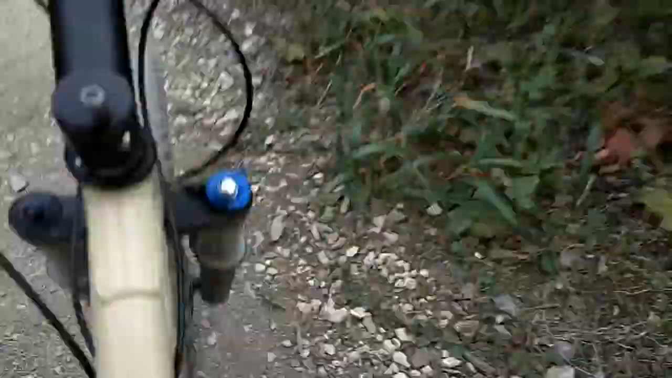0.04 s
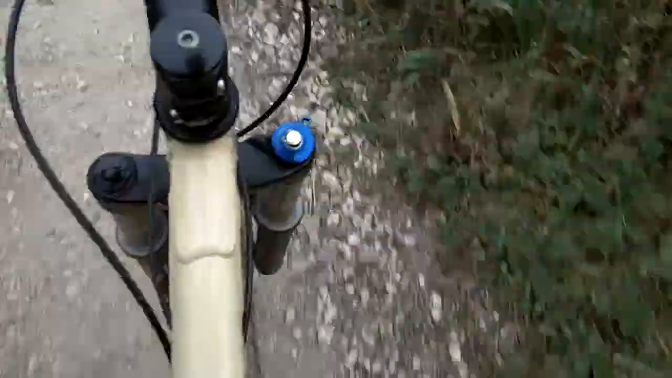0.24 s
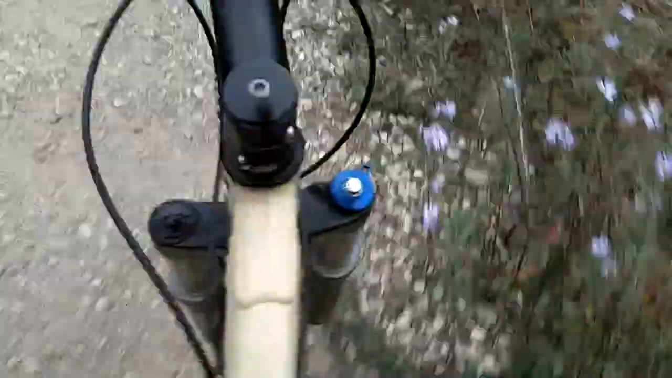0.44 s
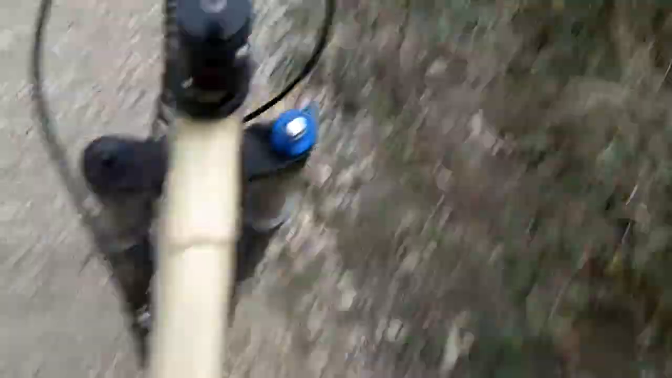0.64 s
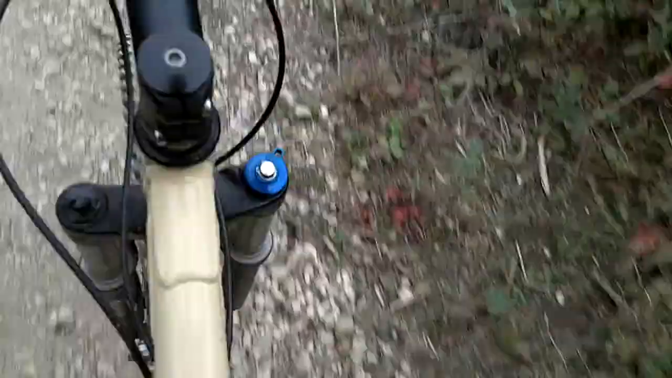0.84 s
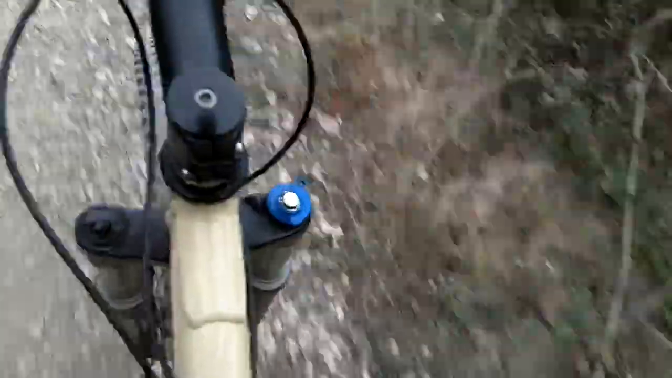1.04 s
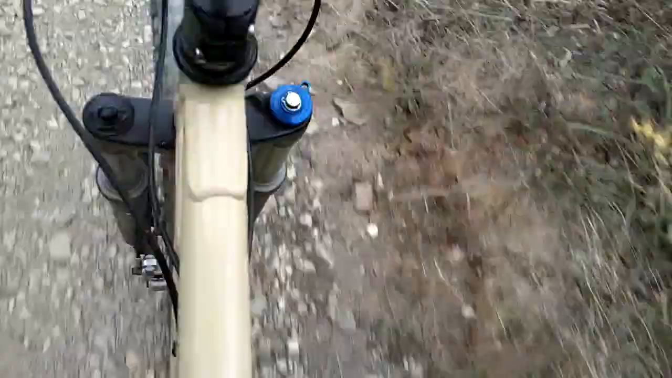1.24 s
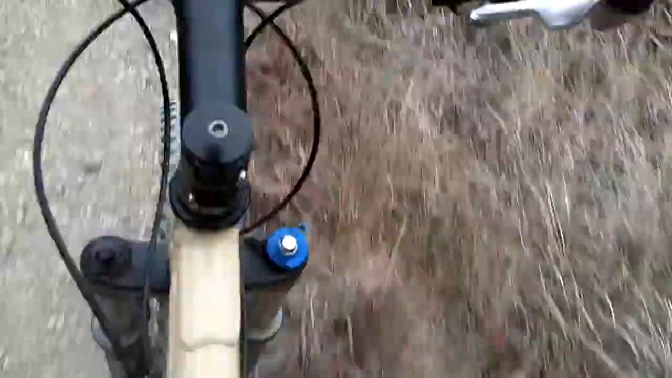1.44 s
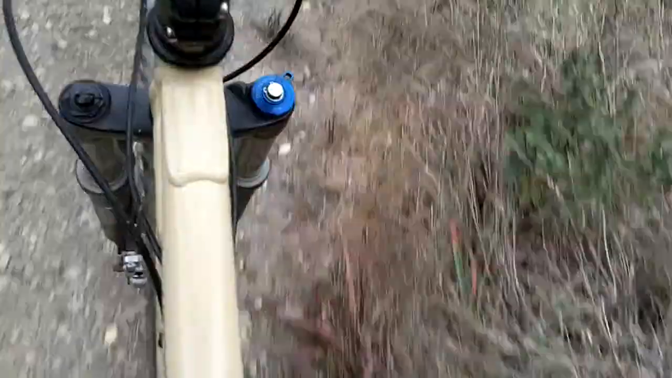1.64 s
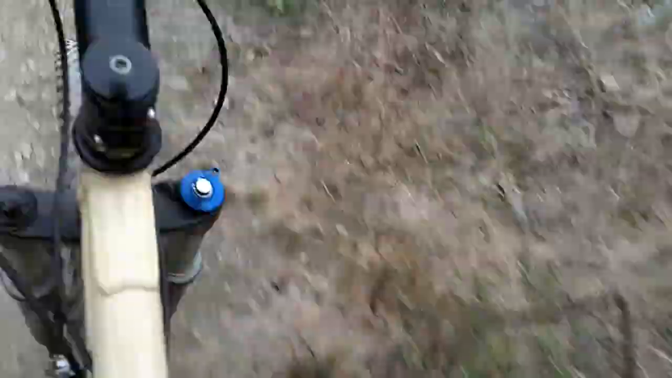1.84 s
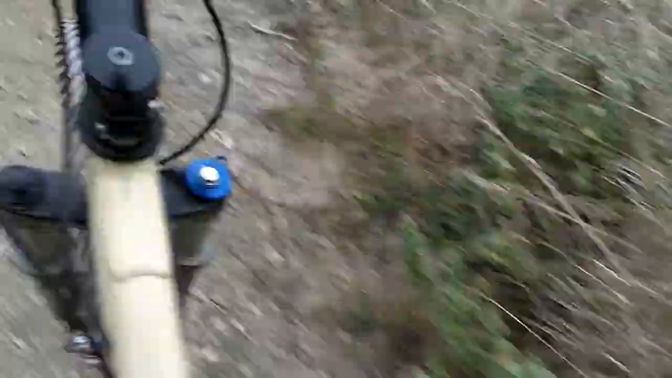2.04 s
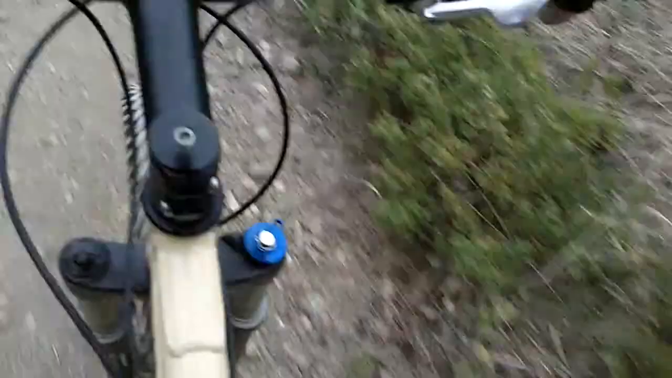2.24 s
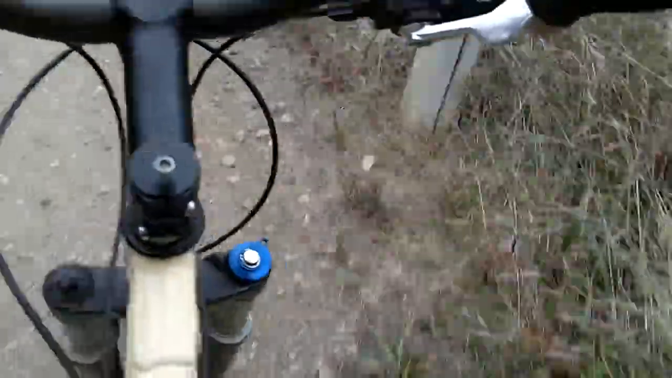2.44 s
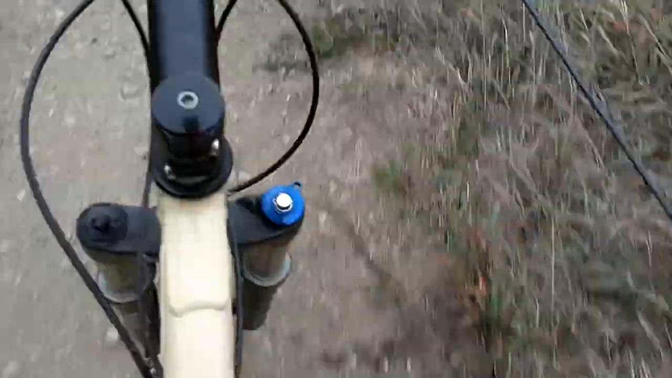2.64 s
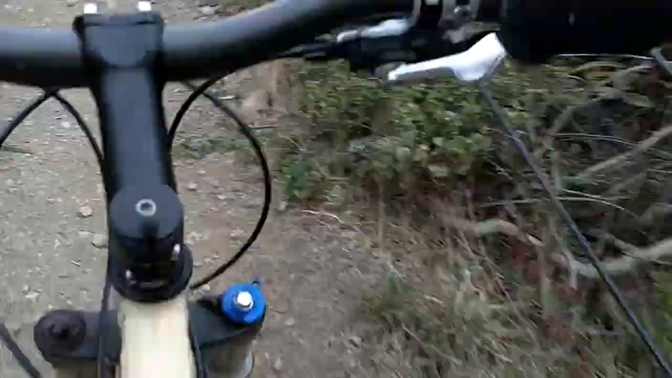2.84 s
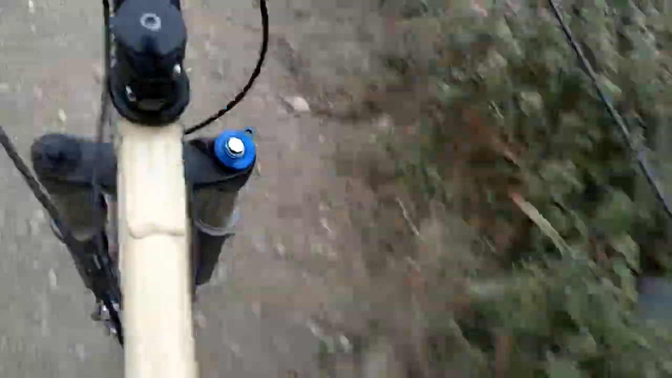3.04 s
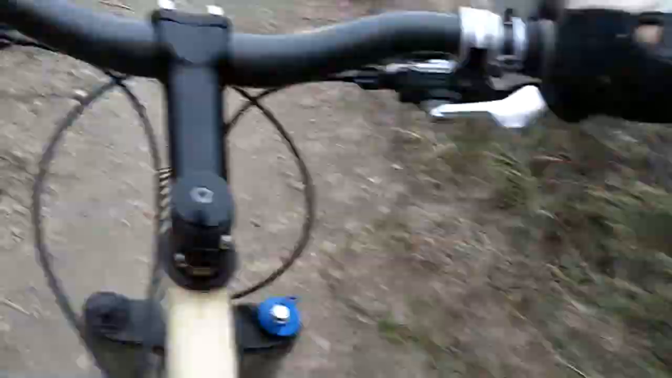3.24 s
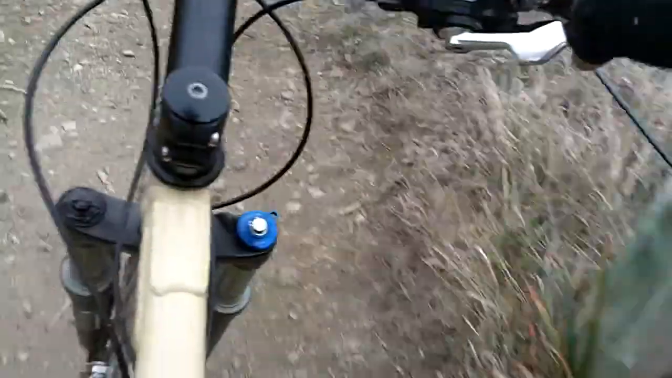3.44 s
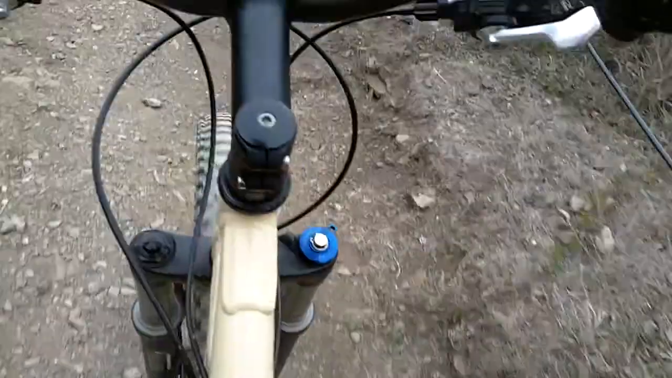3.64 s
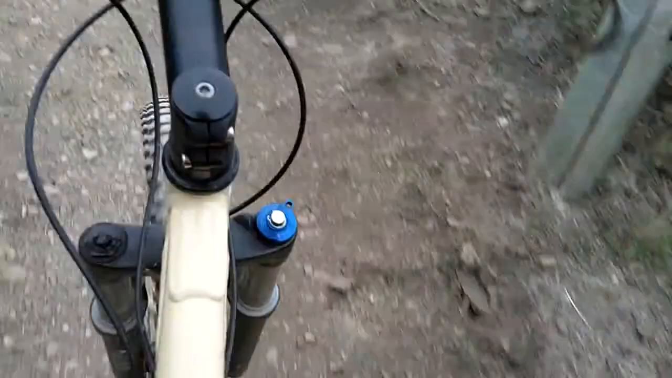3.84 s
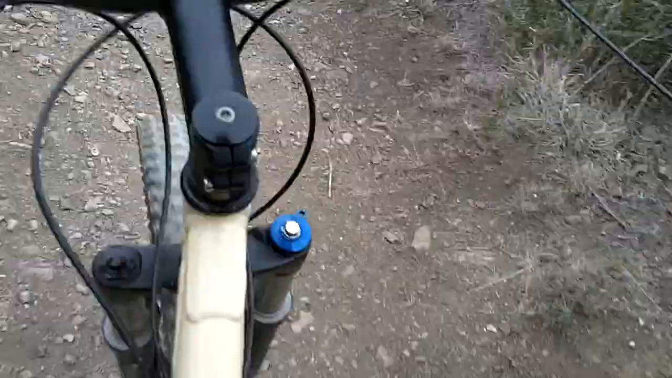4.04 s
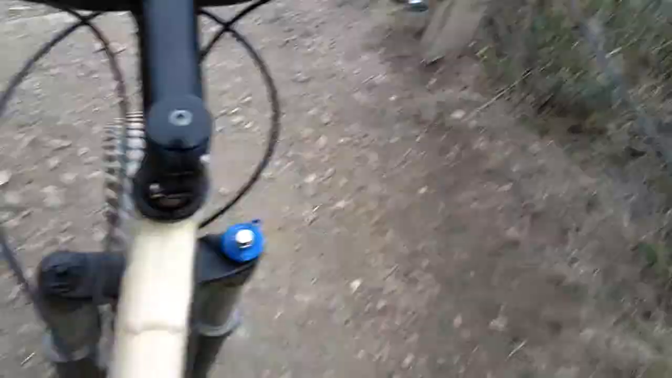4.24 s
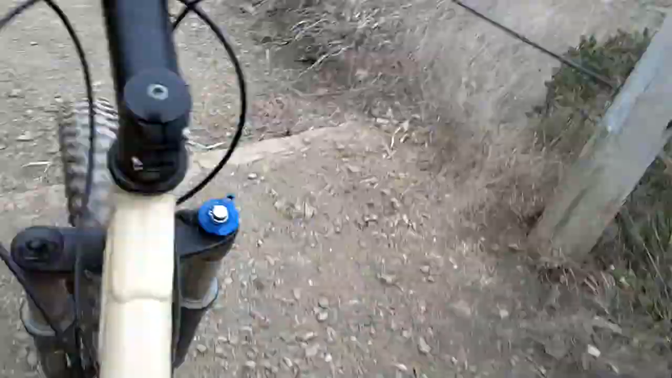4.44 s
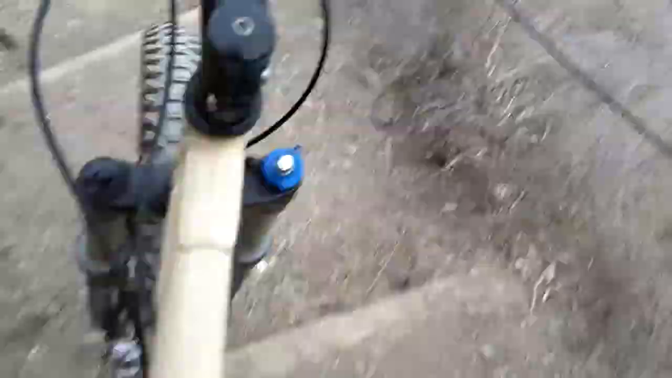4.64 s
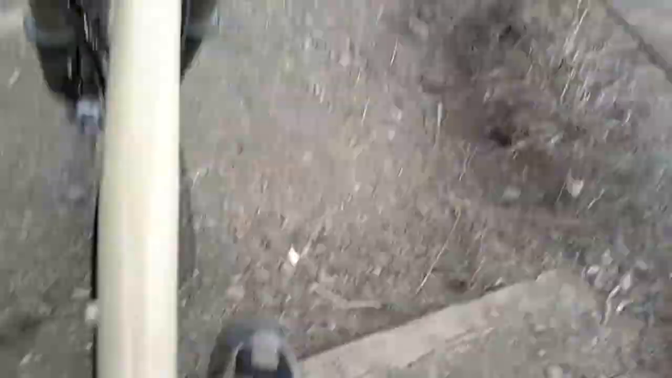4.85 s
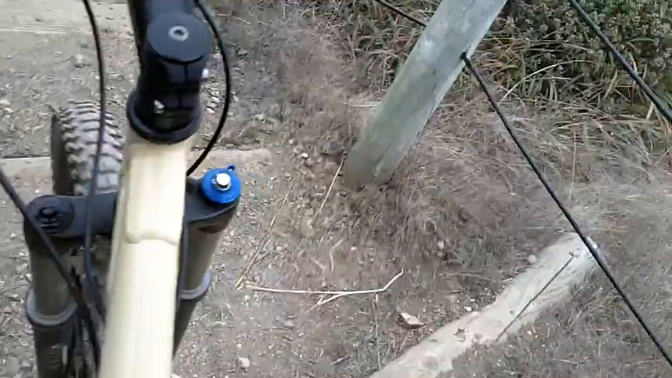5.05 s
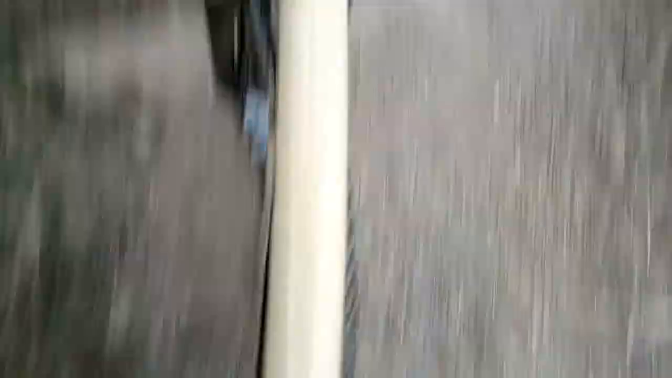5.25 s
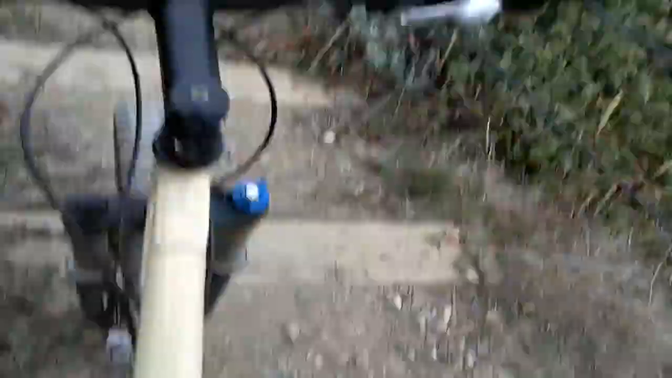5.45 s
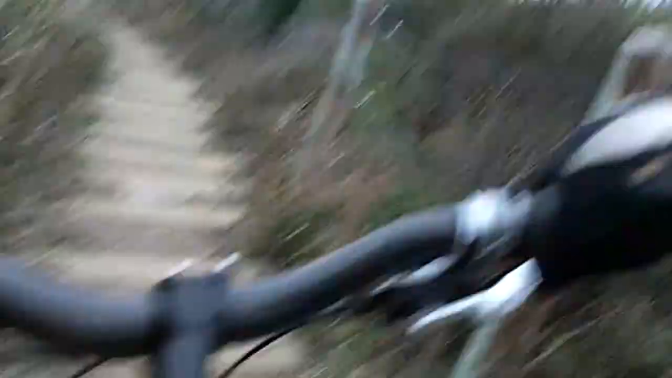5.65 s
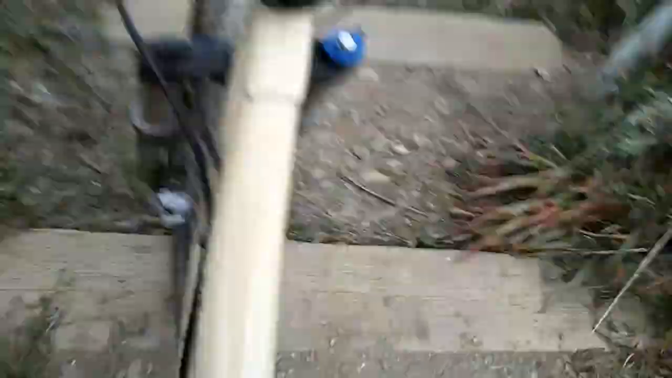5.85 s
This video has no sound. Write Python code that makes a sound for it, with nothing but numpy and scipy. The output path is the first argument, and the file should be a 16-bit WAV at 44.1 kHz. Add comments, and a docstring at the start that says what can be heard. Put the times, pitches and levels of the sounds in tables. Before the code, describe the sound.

A mountain bike speeds down a dry gravel trail, heard close and dry from a camera on the rider's chest. From 0 s, tyres make a dense, uneven gritty crunch over a hollow midrange drumming, fullest around 1.1 to 1.5 s, with stones cracking and popping at irregular moments. Low thuds of jolted air come at 0.1-0.2, 0.75 (with a plastic snap), 1.9, 2.5, 2.7, 3.1 and 3.8 s over soft wind rumble. Light chain ticks are scattered throughout. From about 2 s a faint, high freewheel sizzle fades in; a tiny disc ting sounds at 3.6 s, with faint brushing rings around it. Rolling weakens after 4.7 s. At 5.0 s a deep thump and sharp case snap begin the drop over timber steps: crowded heavy knocks, peaking at 5.3, 5.5 and 5.6 s, chain clatter strongest near 5.57 s, and rising, tearing wind with sharper pops until 5.9 s.

```python
"""Tyres crunch and drum on gravel as a mountain bike rolls fast downhill, then drops over timber steps.
We hear it from a camera on the rider's chest. Random tiny impacts, shaped by spectra, make the ground noise.
Larger stones crack, the freewheel buzzes, the chain rattles and a brake disc sings: clicks and noise that ring.
Wind is shaped noise and lumps, and jolts are short pushes of air that thump the camera.
Its case snaps in its mount with a very short ring, and cuts narrow hollows in the treble."""
import sys
import numpy as np
from scipy import signal
from scipy.fft import rfft, irfft
from scipy.io import wavfile
from scipy.ndimage import uniform_filter1d, map_coordinates

SR = 44100
rng = np.random.default_rng(int(sys.argv[2]) if len(sys.argv) > 2 else 0)


def dump(signal):
    """Clip the signal to [-1, 1] and save it as 16-bit WAV at the path in sys.argv[1]."""
    limited = np.clip(np.atleast_2d(signal).T, -1, 1)
    pcm = np.round(limited * 32767).astype(np.int16)
    wavfile.write(sys.argv[1], SR, pcm)


N = 260631
TIME = np.arange(N) / SR  # seconds
LEAD_S = 0.02  # a burst starts this long before its main contact

# All levels in the tables are relative: each source also has a gain of its own.
# how strongly the tyres roll on the ground: [time_s, drumming_db, crunch_db]
ROLLING = [(0.0, -40.5, -35), (0.42, -38, -38), (0.7, -39, -36), (1.1, -33, -32.5), (1.5, -35.5, -33),
           (1.95, -35.5, -34.5), (2.5, -37, -34.5), (2.7, -37.5, -36.5), (3.1, -38.5, -34.5),
           (3.85, -40, -36.5), (4.6, -40.5, -37.5), (4.8, -50.5, -44.5), (5.13, -48, -49.5),
           (5.91, -57, -58)]
# jolts and gusts, low ones soft heaves, high ones short pops: [time_s, level_db, pitch_hz, stirred_air_db]
JOLTS = [(0.134, -15.5, 110, -36), (0.235, -16, 128, -38), (0.355, -22, 155, -36), (0.652, -28, 178, -32),
         (0.745, -20, 75, -36.5), (0.902, -21, 118, -49), (1.882, -19, 109, -37.5), (2.017, -23, 140, -45),
         (2.478, -15.5, 160, -31), (2.549, -24, 63, -32), (2.712, -15.5, 125, -40),
         (3.125, -12.5, 77, -28.5), (3.171, -19, 170, -36), (3.835, -16.5, 67, -44),
         (3.952, -18.5, 228, -34), (4.006, -27, 140, -33.5), (4.172, -22.5, 126, -47),
         (5.016, -10, 45.3, -25), (5.168, -15, 88.5, -26.5), (5.182, -10.5, 90, -32),
         (5.207, -10.5, 170, -29), (5.235, -14.5, 190, -29), (5.293, -2.5, 163, -30),
         (5.307, -14, 249, -45), (5.351, -13.5, 340, -22.5), (5.522, -2, 390, -25.5),
         (5.585, -13, 150, -31), (5.622, -1, 185, -23), (5.673, -9.5, 126, -36), (5.694, -17, 600, -35),
         (5.721, -9.5, 317, -33), (5.733, -12, 211, -25), (5.83, -5, 680, -23), (5.838, -6.5, 497, -32),
         (5.884, -4.5, 211, -22.5), (5.896, -3.5, 665, -36)]
# resonances of the tyre: [pitch_hz, width_hz, height_db above the spectrum]
TYRE_RESONANCES = [(292, 35, 9), (515, 26, 0), (666, 34, 3.5)]
# metal resonances of the hub, used for the chain too: [pitch_hz, width_hz, height_db above the spectrum]
METAL_RESONANCES = [(3830, 300, 6.6), (4140, 440, 8.5), (6010, 90, 8.3), (9580, 130, 4.8), (13950, 110, 5)]
# colour of the chain's sound: [frequency_hz, level_db]
CHAIN_SPECTRUM = [(1000, -93), (3000, -19), (4500, 12), (6500, 9), (9000, 4.5), (12000, -9), (16000, -2)]


def amp(db):
    """Turns decibels into a gain."""
    return 10 ** (np.asarray(db) / 20)


def evened(x):
    """Scales a sound to an rms of one."""
    return x / np.sqrt(np.mean(x ** 2) + 1e-20)


def follow(rows, axis):
    """The gain that one dB column of a curve gives at every sample."""
    rows = np.array(rows)
    return amp(np.interp(TIME, rows[:, 0], rows[:, axis]))


def add(mix, start_s, sound):
    """Mixes a sound in at a time."""
    part = mix[max(round(start_s * SR), 0):][:len(sound)]
    part += sound[:len(part)]


def band(x, edges_hz):
    """Keeps the part of a sound between two frequencies."""
    return signal.sosfilt(signal.butter(3, edges_hz, "band", fs=SR, output="sos"), x)


def drift(rate_hz):
    """A random wavering of rms one, whose changes weaken above a rate."""
    hz = np.fft.rfftfreq(N, 1 / SR)
    spectrum = rfft(rng.standard_normal(N)) / (1 + (hz / rate_hz) ** 2)
    return evened(irfft(spectrum, N))


def swell(peak_s, rise_s, fall_s):
    """A rounded envelope that reaches one at a time."""
    t = TIME - peak_s
    return np.exp(-np.minimum((t / np.where(t < 0, rise_s, fall_s)) ** 2, 50))


def body(spectrum, modes=(), size=8192):
    """What an object sounds like when struck once: a smooth spectrum with resonances standing on it."""
    hz = np.fft.rfftfreq(size, 1 / SR)
    spectrum_hz, level_db = np.transpose(spectrum)
    gain = amp(np.interp(np.log(hz + 1), np.log(spectrum_hz), level_db))
    peaks = sum(amp(height) ** 2 / (1 + (2 * (hz - pitch) / width) ** 2) for pitch, width, height in modes)
    gain = gain * np.sqrt(1 + peaks)
    # folding the cepstrum (the spectrum of the log gain) makes the response start at once
    cepstrum = irfft(np.log(gain))
    cepstrum[1:size // 2] *= 2
    cepstrum[size // 2 + 1:] = 0
    return irfft(np.exp(rfft(cepstrum)))[:size // 2]


def sound_of(drive, response, edges_hz):
    """Drives a body, and scales the result to an rms of one within a band."""
    x = signal.oaconvolve(drive, response)[:N]
    return x / np.std(band(x, edges_hz))


def grains(per_s, spread_db, size=N):
    """Tiny impacts at random times, with random signs and strengths."""
    strength = amp(spread_db * np.minimum(rng.exponential(1, size), 4))
    sign = rng.choice([-1, 1], size)
    happens = rng.random(size) < per_s / SR
    return strength * sign * happens


def burst(response, edges_hz, length_s, per_s, build, contact, size=4096):
    """Impacts on one body build up to a main contact at LEAD_S and die away; scaled by its loudest moment."""
    t = np.arange(size) / SR - LEAD_S
    hits = grains(per_s, spread_db=2.0, size=size)
    hits[round(LEAD_S * SR)] = contact
    fade_s = np.where(t < 0, build, 1) * length_s
    x = signal.fftconvolve(hits * np.exp(-abs(t / fade_s)), response)[:size]
    # the highest short-time rms within the band becomes one
    return x / np.sqrt(uniform_filter1d(band(x, edges_hz) ** 2, size=128).max())


def tyres(flutter_db=2.5, grind_power=2.07, patchy_db=0.72):
    """Knobs drum on the ground and ring the casing, while grit cracks beneath them in clumps."""
    # colours of the drumming, of loose gravel shifting under load, and of the crunch: [frequency_hz, level_db]
    tread_spectrum = [(120, -14.5), (230, -8), (300, 1), (420, 0), (690, -1.5), (850, -8.5), (1100, -13),
                      (1600, -21), (3000, -43), (8000, -43)]
    grind_spectrum = [(300, -33.5), (700, -10), (850, -0.5), (1000, -3.5), (1130, 5), (1330, -4.5),
                      (1550, -24), (3000, -1.5), (6000, -31), (9500, -20), (15000, -54)]
    gravel_spectrum = [(300, -29), (900, -4.5), (1400, -2), (1800, 3), (2350, 3.5), (3300, 2), (4300, -1.5),
                       (5200, -2.5), (6500, -12), (8000, -24.5), (10000, -17), (11800, -39), (14000, -18.5),
                       (16000, -41)]

    ground = drift(rate_hz=59)  # the uneven load on the tread
    force = load(axis=1)
    knobs = evened(grains(per_s=1500, spread_db=2.0)) * amp(2 * ground)
    drum = force * sound_of(knobs, body(tread_spectrum, TYRE_RESONANCES), (400, 1400))

    slips = grains(per_s=2200, spread_db=2.2) * amp(1.6 * ground)
    shifting = sound_of(slips, body(grind_spectrum), (400, 1400))
    # the grinding grows steeply with the load, up to a limit
    grind = shifting * np.minimum(force / amp(-32), 1.1) ** grind_power

    flutter = flutter_db * drift(rate_hz=150)
    dust = evened(grains(per_s=5000, spread_db=3.0) * amp(2 * ground + flutter))
    grit = dust + amp(-1) * pebbles(ground)
    crunch = sound_of(grit, body(gravel_spectrum), (1600, 5200)) * load(axis=2)

    patches = amp(patchy_db * drift(rate_hz=51))  # looser and firmer patches of ground
    return patches * (amp(-2.0) * drum + amp(-36) * grind + amp(0.7) * crunch)


def load(axis, turns_per_s=3.2, heavy_s=0.026, sway_db=0.21, rise_share=0.45):
    """Strength of drumming or crunch: rolling swells once in every wheel turn, and each bite adds to it."""
    # a tyre bites into the ground in a dip or on a step: [time_s, drumming_db, crunch_db, length_s]
    bite_rows = [(0.78, -40, -31.5, .02), (0.867, -55, -36, 0.071), (0.972, -54, -29.5, 0.047),
                 (1.266, -33.5, -30, 0.038), (4.266, -33.5, -30.5, 0.038), (4.36, -36, -32.5, 0.02),
                 (4.486, -36, -39, 0.049), (4.844, -41, -36.5, 0.04), (4.908, -42, -31.5, 0.012),
                 (4.965, -41, -34, 0.057), (5.225, -40.5, -32.5, 0.044), (5.275, -58, -33, 0.072),
                 (5.42, -57, -43, 0.12), (5.482, -33.5, -40, 0.028), (5.511, -29.5, -41, 0.025),
                 (5.557, -33, -35, 0.046), (5.613, -33.5, -38, 0.013), (5.711, -37.5, -45, 0.054),
                 (5.756, -39, -42.5, 0.041), (5.819, -32.5, -51, .015), (5.853, -34.5, -38.5, 0.063)]

    sway = amp(sway_db * np.cos(2 * np.pi * turns_per_s * (TIME - heavy_s)))
    # a bite swells in a share of its length, and fades over the whole length
    bites = sum((amp(row[axis]) * swell(row[0], rise_share * row[-1], row[-1])) ** 2 for row in bite_rows)
    return np.sqrt((sway * follow(ROLLING, axis)) ** 2 + bites)


def pebbles(ground, clump_db=2.5, sharpness=16, count=36):
    """Each size of pebble clacks at its own pitch, in its own flurries."""
    out = np.zeros(N)
    flurry_s = np.arange(0, N / SR + 0.1, 0.02)
    for hz in np.geomspace(1100, 12000, count) * rng.uniform(0.97, 1.03, count):
        flurry = np.interp(TIME, flurry_s, rng.standard_normal(len(flurry_s)))
        hits = evened(grains(per_s=70, spread_db=2.5) * amp(clump_db * flurry + 2.07 * ground))
        out += signal.lfilter(*signal.iirpeak(hz, sharpness, SR), hits)
    return evened(out)


def stones():
    """Larger stones are crushed or spat out by a tyre: short bursts of impacts, each with its own pitch."""
    # single stones: [time_s, level_db, length_s, pitch_hz]
    stone_rows = [(0.04, -26.5, 0.012, 2500), (0.354, -27.5, 0.0039, 3440), (0.497, -26, 0.0085, 2040),
                  (0.596, -27, 0.0096, 2100), (0.67, -23.5, 0.0097, 1880), (1.001, -25, 0.014, 3140),
                  (1.056, -24.5, 0.03, 2240), (1.125, -25.5, 0.029, 3280), (1.384, -27, 0.0044, 2060),
                  (1.429, -27, 0.022, 1060), (1.457, -25, .007, 3070), (1.531, -22.5, 0.0054, 1900),
                  (1.7593, -23, 0.0096, 1340), (1.8047, -28, .007, 1310), (1.9424, -26, 0.0031, 1100),
                  (2.04, -21.5, 0.0062, 2210), (2.079, -27.5, 0.0067, 1920), (2.204, -28, 0.0052, 2000),
                  (2.372, -27.5, .005, 3480), (2.475, -26.5, 0.005, 1800), (2.606, -23, 0.0045, 1900),
                  (2.652, -25, 0.0046, 1850), (2.715, -28.5, .003, 1790), (2.755, -27.5, 0.018, 1880),
                  (3.226, -29, .007, 1730), (3.832, -29.5, 0.0081, 3650), (4.155, -28.5, 0.0021, 1870),
                  (4.84, -34.5, 0.0063, 880), (5.175, -30, 0.011, 4260), (5.257, -23.5, 0.0032, 2880),
                  (5.487, -32.5, .004, 1690), (5.561, -25, 0.0096, 4600), (5.62, -22, 0.0037, 3200)]
    # colour of a stone: [frequency_hz, level_db]
    stone_spectrum = [(200, -9.5), (600, 2), (1400, -3.5), (1900, 6), (3400, 5.5), (5000, -5.5),
                      (7000, -14), (11000, -28), (16000, -75)]

    out, edges_hz = np.zeros(N), (1500, 5200)
    for s, db, length_s, hz in stone_rows:
        own_pitch = (hz, 0.32 * hz, 6)
        response = body(stone_spectrum, TYRE_RESONANCES + [own_pitch])
        crack = burst(response, edges_hz, length_s, per_s=2500, build=0.28, contact=3.2)
        add(out, s - LEAD_S, amp(db + 3.5) * crack)
    return out


def freewheel(clicks_hz=310, wobble=0.14, hiss=0.93):
    """Pawls tick over the ratchet so fast that the hub gives a ringing sizzle."""
    # strength of the buzz while coasting: [time_s, level_db]
    coasting = [(1.9, -86), (2.05, -62.5), (2.8, -55), (4.72, -56), (4.87, -70), (5.91, -59)]
    # colour of the pawls' clicks: [frequency_hz, level_db]
    pawl_spectrum = [(800, -43), (2000, -23), (3000, -29.5), (4200, 3.5), (5500, 4), (7000, -6.5),
                     (8500, -3.5), (9700, -1), (11500, -23), (13300, -13), (16000, -19)]

    teeth = np.cumsum(clicks_hz * (1 + wobble * drift(rate_hz=3.8))) / SR  # teeth passed so far
    clicks = np.exp(-(teeth % 1) / 0.4)
    ticks = (hiss * 0.44 + clicks) * rng.standard_normal(N)
    ring = sound_of(ticks, body(pawl_spectrum, METAL_RESONANCES), (8800, 10400))
    return amp(1.5) * ring * follow(coasting, axis=1)


def with_bounce(x, delay_s=0.00132, sway=0.14, share=0.69):
    """Adds the reflection off the rider's moving legs, whose changing path makes the treble swish."""
    delay = delay_s * (1 + sway * drift(rate_hz=2.0))
    return x + share * map_coordinates(x, [(TIME - delay) * SR], order=3)


def chain():
    """The chain and cables slap the frame: quick bursts of impacts that ring like metal."""
    # single rattles: [time_s, level_db, length_s]
    rattle_rows = [(0.535, -31, .005), (0.602, -30.5, 0.004), (0.92, -30, 0.0034), (0.943, -35, .004),
                   (1.63, -26.5, 0.0029), (1.862, -26, 0.0029), (2.232, -29, 0.0054), (3.925, -33, .0065),
                   (4.006, -33, .005), (4.167, -32, 0.0041), (4.329, -27.5, .007), (4.939, -34.5, 0.0036),
                   (5.079, -30.5, 0.0075), (5.162, -29.5, 0.0029), (5.26, -28, 0.0053), (5.316, -28, 0.004),
                   (5.384, -36, 0.012), (5.431, -27.5, 0.0078), (5.439, -27, 0.0096), (5.511, -26, 0.013),
                   (5.559, -20.5, 0.0083), (5.574, -19.5, 0.0086), (5.704, -32, 0.0066)]

    out, edges_hz = np.zeros(N), (5700, 15000)
    response = body(CHAIN_SPECTRUM, METAL_RESONANCES)
    for s, db, length_s in rattle_rows:
        rattle = burst(response, edges_hz, length_s, per_s=2200, build=0.04, contact=1.8)
        add(out, s - LEAD_S, amp(db - 5.5) * rattle)
    return out


def jingling(per_s=20, level_db=-46.5, power=2.3, length_s=0.004, size=1024):
    """The slack chain jingles lightly by itself, much more where the tyres drum harder."""
    cluster = rng.standard_normal(size) * np.exp(-np.arange(size) / SR / length_s)
    envelope = signal.oaconvolve(abs(grains(per_s, spread_db=4.5)), abs(cluster))[:N]
    touches = envelope * rng.standard_normal(N)
    ring = sound_of(touches, body(CHAIN_SPECTRUM, METAL_RESONANCES), (5700, 15000))
    shaking = follow(ROLLING, axis=1)
    return amp(level_db) * ring * (shaking / shaking.max()) ** power


def disc(size=8192):
    """A brake disc touches its pad: the thin steel swells into one note and dies away."""
    # single touches: [start_s, level_db, pitch_hz, decay_s]
    ting_rows = [(3.637, -30, 6635, 0.014)]

    out, t = np.zeros(N), np.arange(size) / SR
    for s, db, hz, decay_s in ting_rows:
        envelope = (1 - np.exp(-t / 0.004)) * np.exp(-t / decay_s)
        add(out, s, amp(db) * envelope * np.sin(2 * np.pi * hz * t))
    return out


def rubbing(pitch_hz=5960, width_hz=50):
    """The brushing pad keeps one narrow resonance of the brake disc singing faintly."""
    # single brushes: [middle_s, level_db, half_length_s]
    rub_rows = [(2.75, -51, 0.17), (3.14, -57, .07), (3.702, -50, 0.094), (3.912, -46, 0.046),
                (4.55, -46, 0.076)]

    sharpness = pitch_hz / width_hz
    ring = evened(signal.lfilter(*signal.iirpeak(pitch_hz, sharpness, SR), rng.standard_normal(N)))
    return ring * sum(amp(db) * swell(s, half_s, half_s) for s, db, half_s in rub_rows)


def snaps(size=1024, blow=0.22, blow_hz=900):
    """The camera case snaps against its mount, hard plastic on plastic: a sharp blow with a very short ring."""
    # single snaps: [time_s, level_db]
    snap_rows = [(0.7444, -12.5), (5.0137, -7), (5.3639, -10), (5.6779, -17.5)]
    # what the case rings with: [pitch_hz, level_db, t60_s (time to fall by 60 dB)]
    case_ring = [(1620, -29, 0.0095), (3300, 18, 0.0082), (4990, 36, 0.0039), (6100, 34.5, 0.0046),
                 (6800, -62, .004), (10300, -20, 0.0046), (13700, 19, 0.00071)]

    out, t = np.zeros(N), np.arange(size) / SR
    ring = -sum(amp(db - 60 * t / t60) * np.sin(2 * np.pi * hz * t) for hz, db, t60 in case_ring)
    u = 2 * np.pi * blow_hz * t
    snap = ring / abs(ring).max() - blow * (1 - u) * np.exp(-u)
    for s, db in snap_rows:
        add(out, s + 0.0006, amp(db + 6.5) * snap)
    return out


def thumps(stretch=1.52, judder=0.028, mount_hz=190, mount_decay_s=0.0095):
    """Each jolt pushes the air at the microphone, which swings back more slowly while the mount judders."""
    out = np.zeros(N)
    t = np.arange(-SR // 20, SR // 20) / SR
    slow = np.where(t > 0, stretch, 1)
    after = np.maximum(t, 0)
    ring = judder * np.exp(-after / mount_decay_s) * np.sin(2 * np.pi * mount_hz * after)
    for s, db, hz, _ in JOLTS:
        u = 2 * np.pi * hz * t / slow
        push = -u * np.exp((1 - u ** 2) / 2) / slow
        add(out, s + t[0], amp(db) * (push - ring))
    return out


def wind(gusty_db=1.5, eddy_db=-13, tear_db=-33.5, tear_at_db=-19, tear_power=2.34):
    """A deep rumble and lumpy eddies break on the case, stirred by every thump; strong wind tears at it."""
    # strength of the steady wind: [time_s, level_db]
    wind_curve = [(0.0, -38), (0.5, -33.5), (1.05, -30), (1.6, -41), (2.0, -29.5), (2.3, -36.5), (2.8, -33),
                  (3.5, -39.5), (4.05, -35), (4.8, -41), (5.1, -35), (5.43, -32), (5.55, -26), (5.91, -21)]
    # colours of the rumble, of the eddies and of the tearing: [frequency_hz, level_db]
    rumble_spectrum = [(8, 8), (22, 3), (60, -2.5), (100, -8.5), (180, -22.5), (400, -18), (1500, -104)]
    eddy_spectrum = [(40, -34.5), (110, 10.5), (200, 6.5), (300, 0), (500, -10), (1000, -64), (3000, -57)]
    tear_spectrum = [(100, -4), (300, 5.5), (550, 10), (900, 1.5), (1400, -4), (2200, -44), (5000, -46)]

    gusty_air = rng.standard_normal(N) * amp(gusty_db * drift(rate_hz=11))
    rumble = sound_of(gusty_air, body(rumble_spectrum), (20, 90))
    eddies = sound_of(grains(per_s=600, spread_db=2.2), body(eddy_spectrum), (110, 250))
    tearing = sound_of(grains(per_s=700, spread_db=-1.0), body(tear_spectrum), (400, 1400))

    steady = follow(wind_curve, axis=1)
    # the air stirred around each thump
    stirred = np.sqrt(sum((amp(db) * swell(s, rise_s=0.013, fall_s=0.04)) ** 2 for s, _, _, db in JOLTS))
    deep = rumble * np.hypot(steady, stirred)
    lumpy = eddies * np.hypot(amp(eddy_db) * steady, stirred)
    # tearing has the level tear_db where the wind is at tear_at_db, and grows steeply with the wind
    torn = amp(tear_db) * tearing * (steady / amp(tear_at_db)) ** tear_power
    return deep + lumpy + torn


def scene():
    """Adds up all the sources, close and dry, out in the open."""
    sizzle = band(with_bounce(freewheel()), (2200, 18000))
    bike = tyres() + stones() + sizzle + chain() + jingling() + disc() + rubbing()
    return (bike + snaps() + thumps() + wind())[None]


def record(dry, edge_hz=15350):
    """The case cuts narrow hollows in the treble, the loudest peaks are rounded off, and the top treble is cut."""
    # bands that the cavity in front of the microphone cancels: [frequency_hz, width_hz]
    hollow_rows = [(2702, 1034), (5502, 680), (7881, 2270), (10917, 500)]

    for hz, width_hz in hollow_rows:
        dry = signal.lfilter(*signal.iirnotch(hz, hz / width_hz, SR), dry)
    rounded = dry / (1 + (dry / 0.95) ** 6) ** (1 / 6)
    lowpass = signal.firwin(401, edge_hz, window=("kaiser", 8), fs=SR)
    return signal.oaconvolve(rounded, lowpass[None], "same")


dry = scene()
out = record(dry)
dump(out)
```